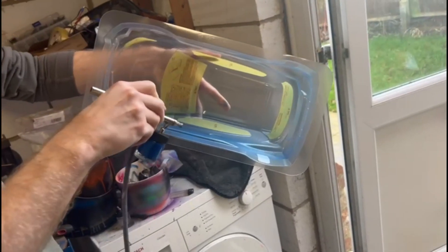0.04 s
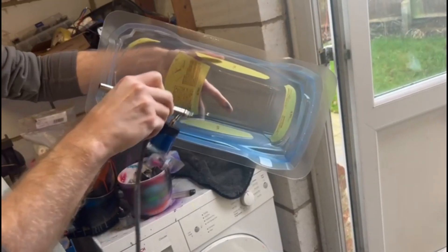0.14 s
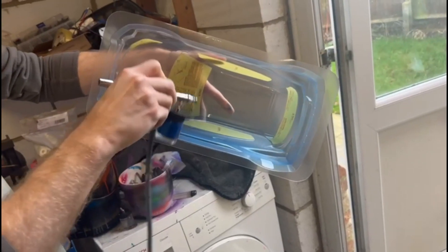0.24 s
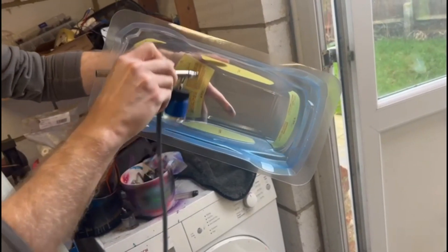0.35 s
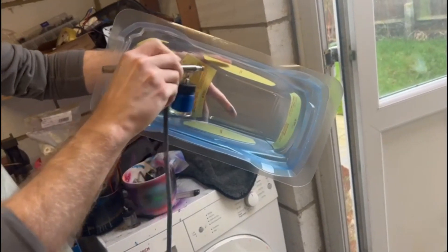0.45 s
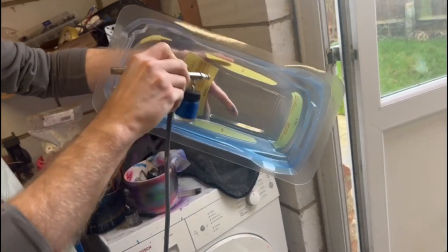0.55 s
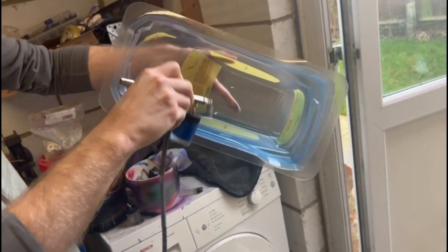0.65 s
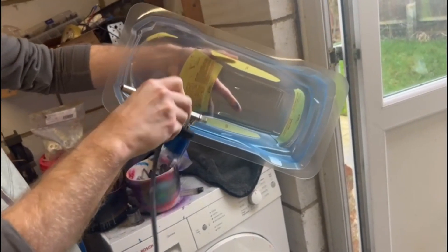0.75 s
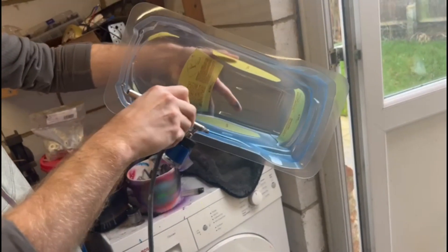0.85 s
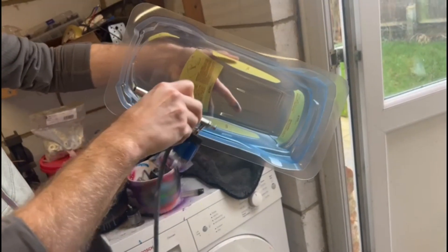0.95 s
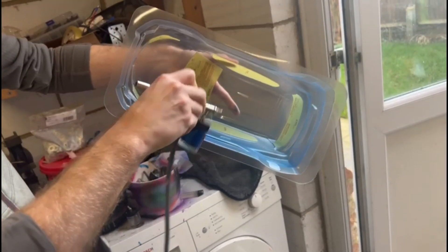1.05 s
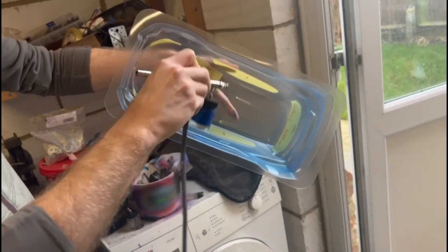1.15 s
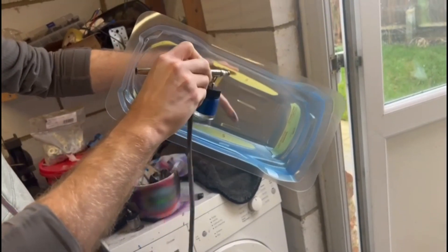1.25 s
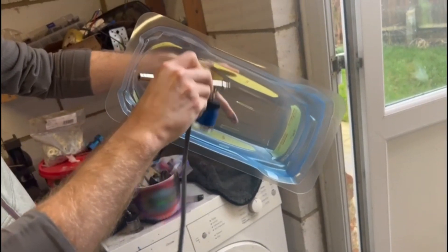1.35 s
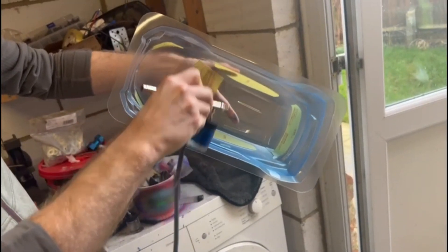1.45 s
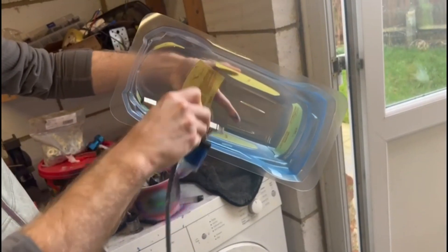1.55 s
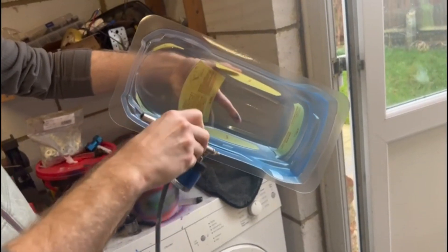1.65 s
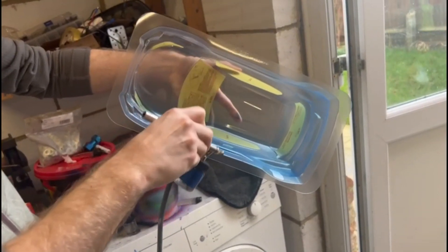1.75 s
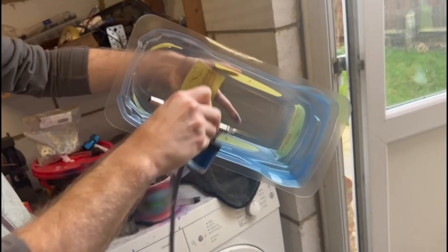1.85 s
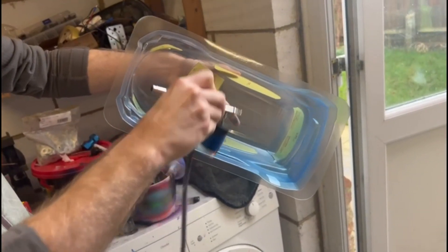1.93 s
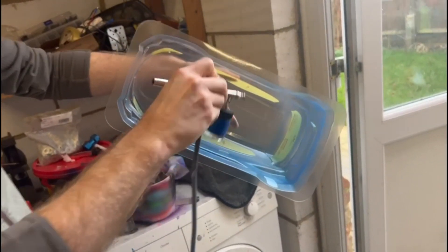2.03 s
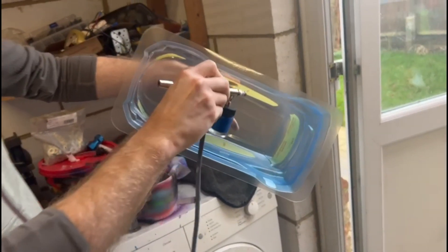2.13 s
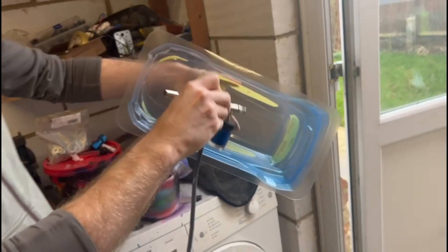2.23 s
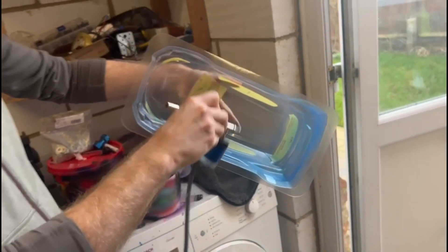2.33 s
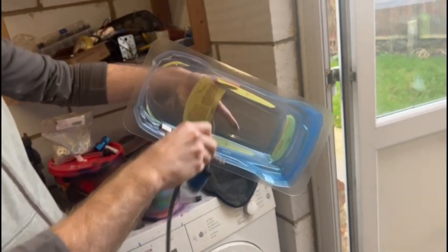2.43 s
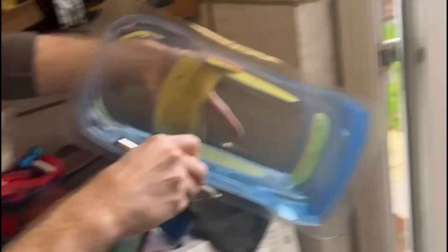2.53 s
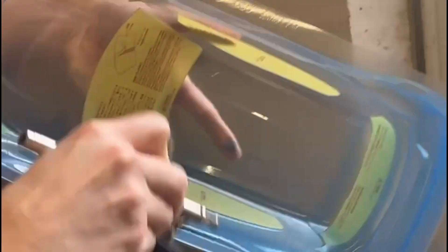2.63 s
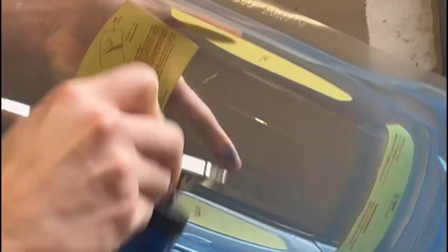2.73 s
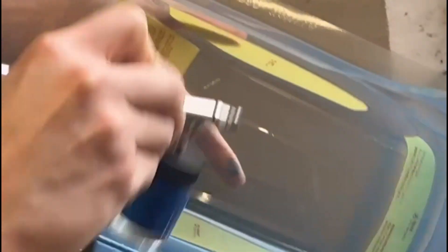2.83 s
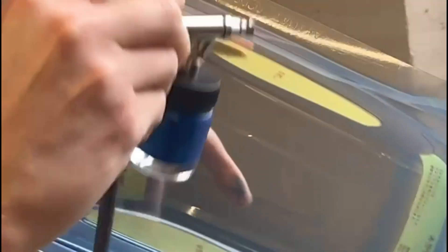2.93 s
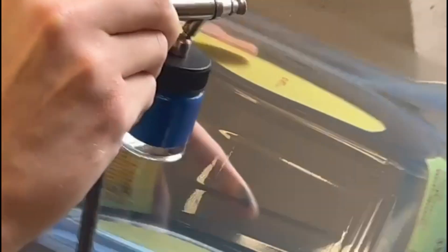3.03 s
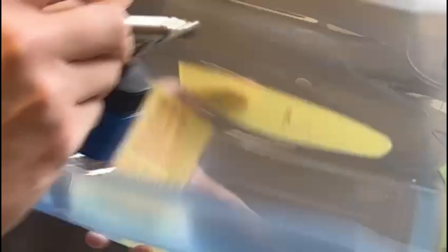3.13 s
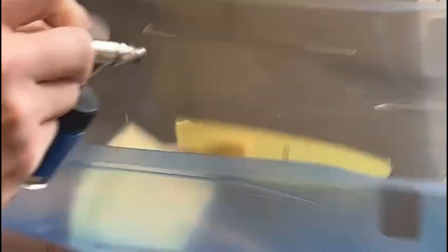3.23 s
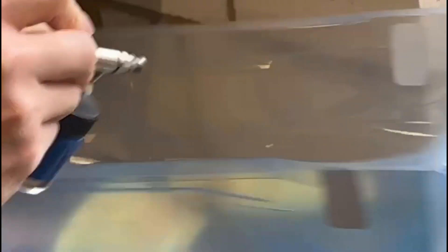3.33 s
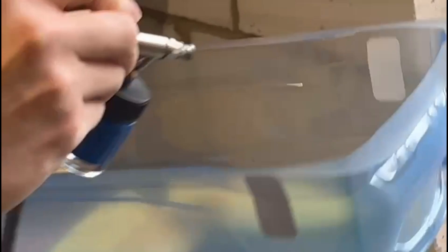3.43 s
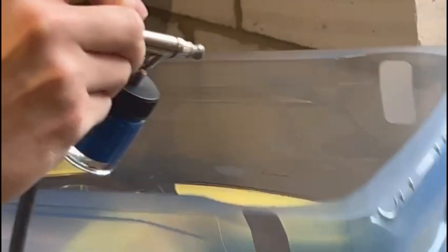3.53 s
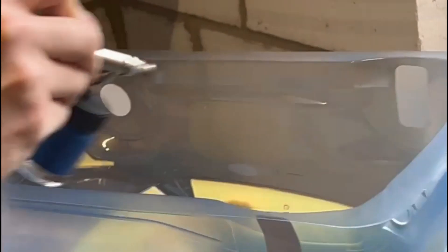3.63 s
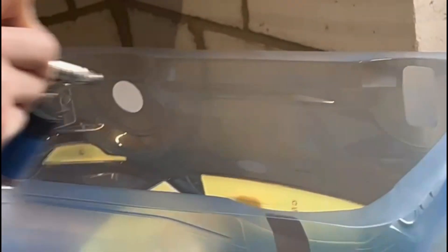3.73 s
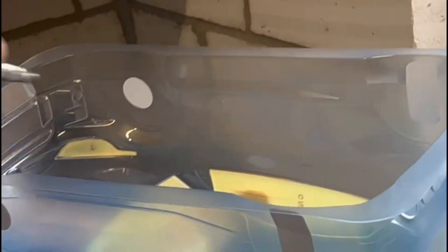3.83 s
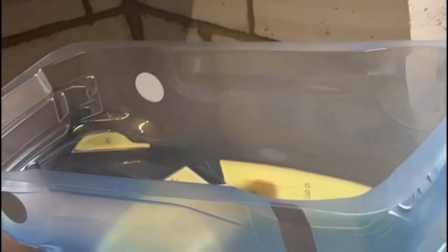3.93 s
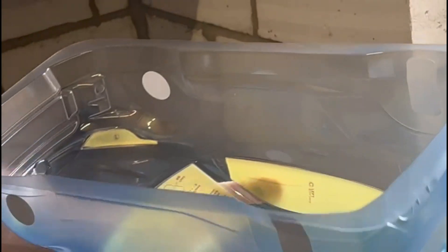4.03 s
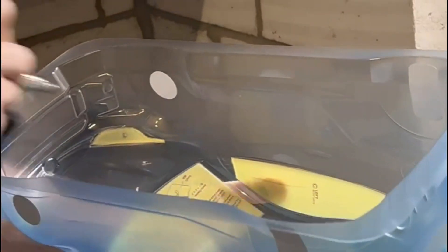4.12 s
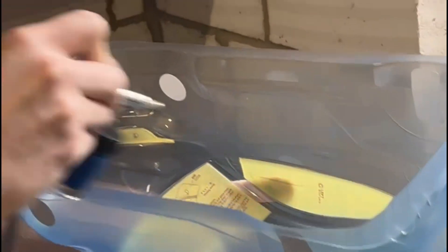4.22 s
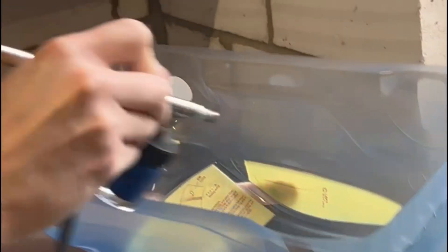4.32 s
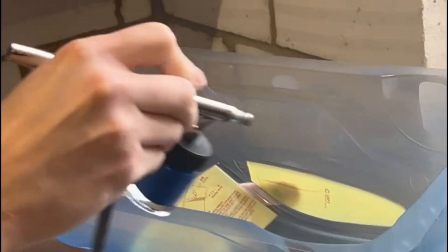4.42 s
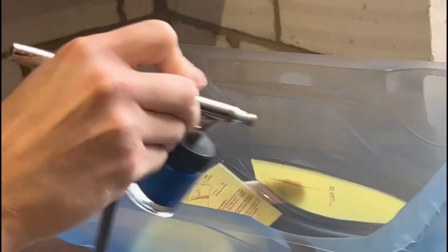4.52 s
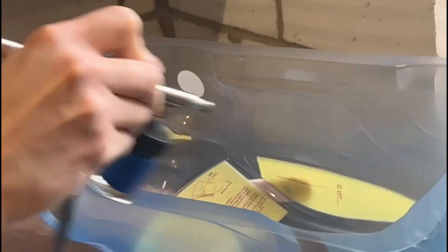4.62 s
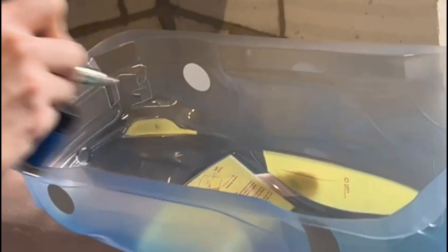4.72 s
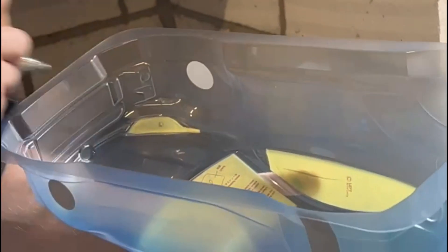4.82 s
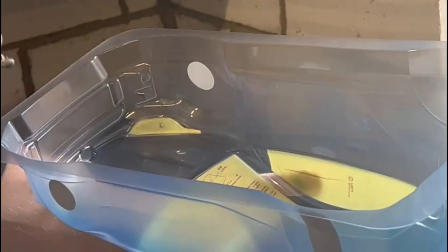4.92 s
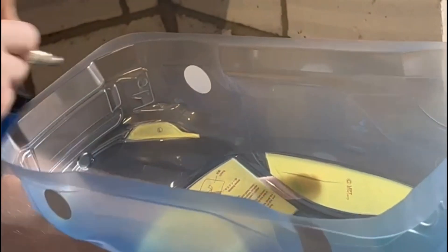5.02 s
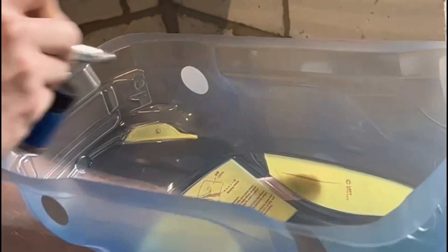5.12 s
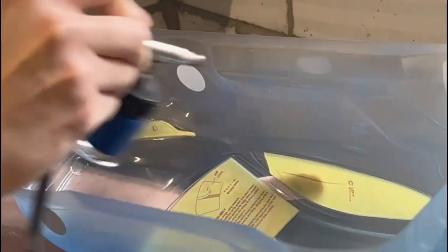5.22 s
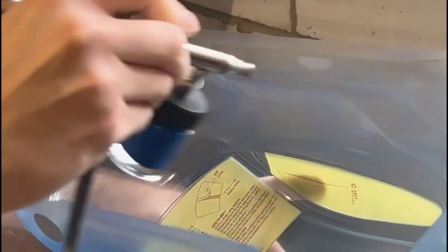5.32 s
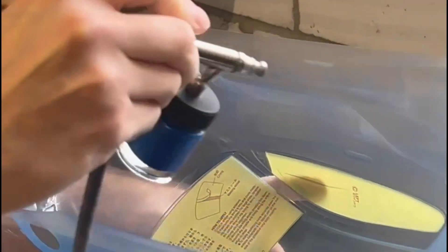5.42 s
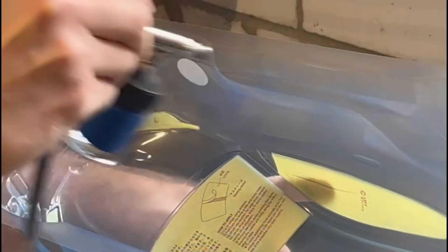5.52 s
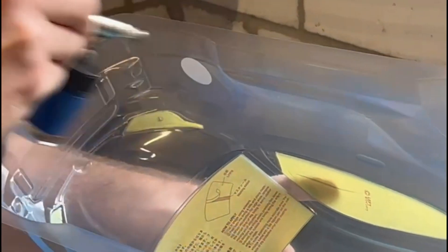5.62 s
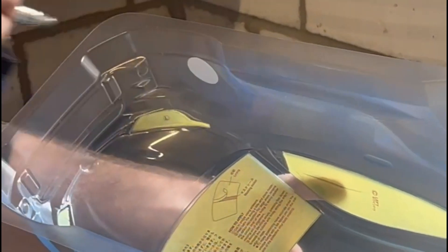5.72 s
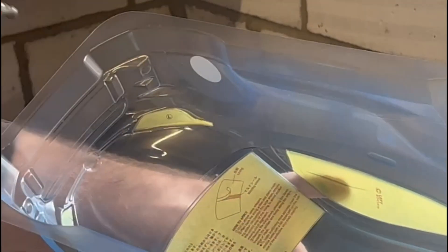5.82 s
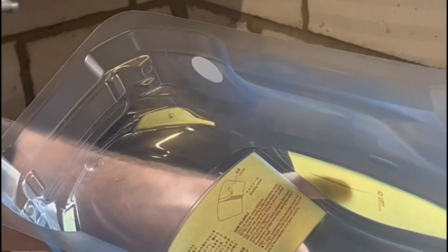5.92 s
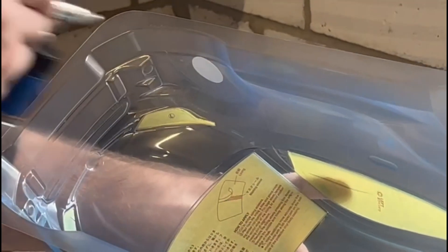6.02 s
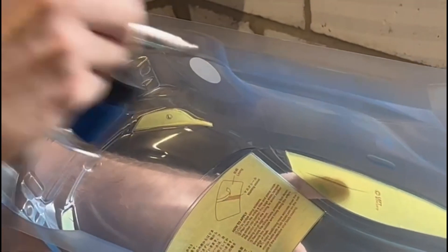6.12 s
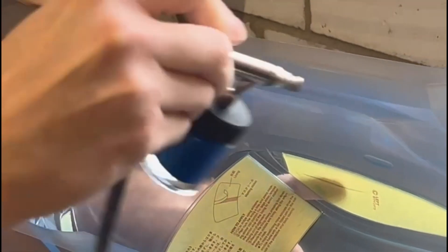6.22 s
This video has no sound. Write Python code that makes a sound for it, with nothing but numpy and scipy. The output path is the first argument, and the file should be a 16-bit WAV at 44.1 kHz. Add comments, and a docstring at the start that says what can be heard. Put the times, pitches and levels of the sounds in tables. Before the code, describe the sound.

An airbrush sprays into a thin plastic model car shell in thirteen short, bright hisses, about two a second, each starting and stopping sharply. The jet rings hollowly in the shell and sometimes whistles lightly. The plastic pops once as it flexes, and after a brief pause the bursts resume slightly softer. A washing machine hums faintly behind, in a small utility room with a close microphone.

```python
"""An airbrush paints a clear plastic model-car shell in thirteen short strokes, in a small utility room.
The turbulent jet hisses, rings the hollow of the shell, whistles on its rim and bounces off its curves.
The thin plastic rumbles in the hand and pops once as it flexes. Behind, over dull room noise, a washing
machine slowly gathers speed. At about 2.5 s the nearby phone zooms in and the stereo image narrows."""
import sys
import numpy as np
from scipy import signal
from scipy.fft import rfft, irfft, next_fast_len
from scipy.io import wavfile
from scipy.ndimage import uniform_filter1d, map_coordinates

SR = 44100
rng = np.random.default_rng(int(sys.argv[2]) if len(sys.argv) > 2 else 0)


def waveform_to_disk(signal):
    """Save audio, clipped to [-1, 1], as 16-bit WAV at the path in sys.argv[1]."""
    frames = np.transpose(np.atleast_2d(signal))
    scaled = np.clip(frames, -1, 1) * 32767
    samples = np.round(scaled).astype(np.int16)
    wavfile.write(sys.argv[1], SR, samples)


N = 276059


def undb(db):
    """Decibels to gain."""
    return 10 ** (np.asarray(db) / 20)


def automation(points):
    """A lane of (t/s, value) breakpoints joined by straight lines."""
    times, values = np.transpose(points)
    return np.interp(np.arange(N) / SR, times, values)


def bins():
    """Frequencies of a padded spectrum, in Hz."""
    return np.fft.rfftfreq(2 * next_fast_len(N // 2 + SR // 2), 1 / SR) + 1e-6


def through(x, response):
    """Filter by a frequency response."""
    return irfft(rfft(x, 2 * len(bins()) - 2) * response)[..., :N]


def colour(points):
    """EQ curve through (f/Hz, level/dB) points."""
    hz, db = np.transpose(points)
    return undb(np.interp(np.log(bins()), np.log(hz), db))


def resonance(hz, width, at=None):
    """One resonant peak, gain 1 at its centre; over the whole spectrum or at given frequencies."""
    f = bins() if at is None else at
    return 1 / (1 + 1j * (f * f - hz * hz) / (f * width))


def modes(rows):
    """A bank of steep-skirted resonances from (f/Hz, nominal width/Hz, level/dB) rows."""
    power = sum(np.abs(undb(db) * resonance(hz, 1.44 * width) ** 2) ** 2 for hz, width, db in rows)
    return np.sqrt(power)


def noise(response):
    """Two unrelated filtered noises (mid, side) of rms 1."""
    x = through(rng.standard_normal((2, N)), response)
    return x / x.std()


def walk(rate_hz):
    """Smooth random modulator: sample and hold, slewed twice; spread near 1."""
    hold = max(int(SR / rate_hz), 1)
    held = rng.standard_normal(N)[np.arange(N) // hold]
    return 1.62 * uniform_filter1d(uniform_filter1d(held, hold), hold)


def ring_down(start_s, hz, db, t60, rise_s):
    """One struck mode with a soft attack and an exponential decay."""
    age = np.maximum(np.arange(N) / SR - start_s, 0)
    envelope = (1 - np.exp(-age / rise_s)) * np.exp(-np.log(1000) * age / t60)
    return undb(db) * np.sin(2 * np.pi * hz * age) * envelope


def room_tone():
    """A dull, gently swelling noise bed, more alike at both ears in the bass."""
    # tone of the bed: f/Hz, level/dB
    bed_eq = [(25, -11.5), (60, 4.5), (120, -2.5), (250, -0.5), (400, -10.5), (900, -11), (1500, -14.5),
              (3000, -26), (6000, -35), (9000, -48), (15000, -57.5)]
    # its fader ride: t/s, level/dB
    bed_ride = [(0, -47), (2.6, -51.5), (3.1, -54), (4.8, -51.5), (6.26, -48.5)]
    mid, side = noise(colour(bed_eq))
    side = through(side, np.minimum(bins() / 1100, 1) ** 0.2)
    swell_db = 1.6 * walk(3.9)
    return undb(automation(bed_ride) + swell_db) * np.array([mid, side])


def washing_machine(start_hz=57, full_hz=113.4, spin_up_s=6.46, waver_db=2):
    """The motor spins up, its first three orders sweep through the panels, and the cabinet booms."""
    # cabinet panels that sing as an order passes: f/Hz, width/Hz, level/dB
    panels = [(71, 8, -51.5), (84, 7.7, -58), (150.5, 11.2, -58), (184.7, 5.9, -52), (236, 16, -67)]
    # fader ride of the cabinet's deep boom: t/s, level/dB
    boom_ride = [(0.2, -47.5), (1, -52.5), (2.2, -49), (3.2, -59), (6.26, -52.5)]
    motor_hz = full_hz + (start_hz - full_hz) * np.exp(-np.arange(N) / SR / spin_up_s)
    phase = 2 * np.pi * np.cumsum(motor_hz * (1 + 0.0029 * walk(6.73))) / SR
    hum = 0
    for order in (1, 2, 3):
        power = sum(np.abs(undb(db) * resonance(hz, width, at=order * motor_hz)) ** 2
                    for hz, width, db in panels)
        hum = hum + np.sqrt(2 * power) * np.sin(order * phase)
    deep_boom = undb(automation(boom_ride)) * noise(resonance(hz=68, width=9.4) ** 2)
    upper_boom = undb(-65.5) * noise(resonance(hz=119, width=36) ** 2)
    return (hum * undb(waver_db * walk(7.5)) + deep_boom + upper_boom) * np.array([[1], [.6]])


def grip_rumble(start_s=2.27, end_s=2.92, level_db=-53.5, fade_s=0.088):
    """The shell rumbles softly as the hand shifts its grip."""
    t = np.arange(N) / SR
    envelope = np.clip(np.minimum(t - start_s, end_s - t) / fade_s + .5, 0, 1)
    return undb(level_db) * envelope * noise(resonance(hz=128, width=50) ** 2)


def shell_pop(start_s=2.4675, wobble_lag_s=.01):
    """The thin plastic snaps through: a quick knock, then the whole panel wobbles."""
    # modes of the buckling shell: f/Hz, level/dB, t60/s
    knock_modes = [(522, -28.5, .04), (580, -22.5, 0.043), (1140, -21.5, 0.011), (1586, -31, 0.018)]
    knock = sum(ring_down(start_s, hz, db, t60, rise_s=0.0014) for hz, db, t60 in knock_modes)
    wobble = ring_down(start_s + wobble_lag_s, hz=63, db=-24.5, t60=.08, rise_s=0.0013)
    return np.array([knock + wobble, 0.89 * knock])


def rim_blast(start_s=0.909, level_db=-33, attack_s=0.0062, decay_s=0.058):
    """A short, soft puff as the jet crosses the edge of the shell."""
    # tone of the puff: f/Hz, level/dB
    puff_eq = [(120, -19), (400, -1.0), (750, -3), (1200, -7.0), (2500, -12), (8000, -43)]
    puff = noise(colour(puff_eq)) * np.array([[1], [.35]])
    age = np.maximum(np.arange(N) / SR - start_s, 0)
    envelope = np.minimum(age / attack_s, 1) * np.exp(-age / decay_s)
    return undb(level_db) * puff * envelope


def shell_reflections(x, depth_db, patch_hz, patch_s):
    """Reflections off the curved shell add and cancel, so peaks and dips wander as the hands move."""
    hz, times, spectrum = signal.stft(x, SR, nperseg=512)
    grid = np.meshgrid(hz / patch_hz, times / patch_s, indexing="ij")
    ripple = np.array([map_coordinates(rng.standard_normal((128, 128)), grid, mode="mirror") for _ in x])
    gain = undb(np.interp(times, np.arange(N) / SR, depth_db) * np.minimum(ripple, 1.2))
    power = np.mean(np.abs(spectrum) ** 2, axis=2, keepdims=True) + 1e-18
    power_gain = np.sum(power * gain ** 2, axis=1, keepdims=True) / np.sum(power, axis=1, keepdims=True)
    gain /= np.sqrt(power_gain)  # the colour moves, the level holds
    return signal.istft(spectrum * gain, SR)[1][:, :N]


def stroke_envelopes(open_s=.006, close_s=0.01, surge=0.068, surge_s=0.0077, swell_s=0.041):
    """One envelope a spray layer: the valve snaps open, the hand sweeps in and away, the valve shuts."""
    # trigger pulls: open t/s, shut t/s, hiss level/dB at the closest point, its place/share of stroke,
    # loss/dB half a stroke away, then level/dB re hiss of rush, cavity, ring and whistle
    trigger_pulls = [ (-0.28, 0.0, -31, 0.26, 1.5, -27, -19, -19.5, -24),
                     (0.092, 0.415, -22.5, 0.52, 7, -36, -16.5, -13, -29),
                     (0.525, 0.773, -21.5, 0.59, 5, -35, -20, -14.5, -37),
                     (0.904, 1.258, -23, 0.59, 7.5, -28.5, -16, -11, -46),
                     (1.377, 1.646, -24.5, 0.56, 5, -27.5, -20, -15.5, -33),
                     (1.773, 2.073, -21.5, 0.53, 6.5, -30.5, -18, -11.5, -12.5),
                     (2.21, 2.432, -22, 0.53, 6, -24.5, -21, -9, -11),
                     (2.6, 2.901, -24, 0.62, 6, -24, -26, -18, -11),
                     (3.49, 3.931, -26.5, 0.65, 6, -31, -19, -33, -23),
                     (4.077, 4.414, -25.5, 0.5, 5, -31.5, -16.5, -26.5, -25),
                     (4.541, 4.878, -25, 0.54, 7, -35, -16.5, -24, -21),
                     (5.001, 5.342, -26, 0.44, 3, -37, -19, -24, -19.5),
                     (5.468, 5.823, -24.5, 0.8, 2.5, -30.5, -18.5, -21, -20),
                     (5.994, 6.243, -26.5, 0.43, 3, -21.5, -17.5, -19.5, -17)]
    # the jet dips into the shell and the rush swells: t/s, level/dB
    rush_swells = [(2.64, -47), (5.21, -47.5), (5.71, -46), (6.09, -56)]
    t = np.arange(N) / SR
    hiss, rush, cavity, ring, whistle = np.zeros((5, N))
    for start, end, db, closest, loss_db, rush_db, cavity_db, ring_db, whistle_db in trigger_pulls:
        age = np.maximum(t - start, 0)
        away = 2 * (np.minimum(age / (end - start), 1) - closest)  # in half strokes
        aim = undb(-loss_db * away ** 2)
        valve = np.minimum(age / open_s, 1) * np.exp(-np.maximum(t - end, 0) / close_s)
        pressure = 1 + surge * np.exp(-age / surge_s)  # the hose charges up between strokes
        flow = undb(db) * aim * valve * pressure
        aimed_flow = flow * aim ** .95  # ring and whistle need a truer aim, so they fade faster
        hiss += flow
        rush += undb(rush_db) * flow
        cavity += undb(cavity_db) * flow
        ring += undb(ring_db) * aimed_flow
        whistle += undb(whistle_db) * aimed_flow
    rush += sum(undb(db) * np.exp(-((t - peak_s) / swell_s) ** 2) for peak_s, db in rush_swells)
    return hiss, rush, cavity, ring, whistle


def airbrush(width, jet_db=-0.69, ring_db=0.5, rush_db=2.0, buffet_db=0.9):
    """The turbulent jet hisses, rings the shell, whistles on the rim and rushes low over the plastic."""
    # bright hiss of the free jet: f/Hz, level/dB
    jet_eq = [(200, -32.5), (700, -20.5), (1200, -17), (1700, -17), (2500, -11), (3700, -9), (6300, -1),
              (8500, 4), (9300, 1.5), (10400, 0.5), (11500, -4.5), (12300, -28), (14300, -15.5),
              (15600, -33)]
    # air rushing over the shell: f/Hz, level/dB
    rush_eq = [(60, -17.5), (130, 2.5), (200, 1.5), (270, 5), (350, -1.5), (500, -4), (900, -17.5),
               (2500, -34)]
    # air modes of the open shell, always stirred by the jet: f/Hz, width/Hz, level/dB
    cavity_modes = [(484, 107, 1), (775, 195, -1.5), (1625, 300, 0.5), (2280, 110, 2), (2930, 880, -1)]
    # hollow ring when the jet is aimed into a recess: f/Hz, width/Hz, level/dB
    recess_modes = [(1354, 200, -5), (1750, 160, -1), (2126, 274, 5.5), (2910, 480, -0.5), (3490, 130, -2)]
    hiss, rush, cavity, ring, whistle = stroke_envelopes()
    jet = hiss * undb(jet_db) * noise(colour(jet_eq)) + cavity * noise(modes(cavity_modes))
    # the wide image takes in more reflections than the zoomed one
    jet = shell_reflections(jet, depth_db=2.3 + 3.8 * width, patch_hz=240, patch_s=.085)
    hollow = ring * undb(ring_db) * noise(modes(recess_modes))
    rim = whistle * noise(resonance(hz=4650, width=800) ** 2)
    tones = shell_reflections(hollow + rim, depth_db=1 + 2.0 * width, patch_hz=194, patch_s=0.096)
    low_air = rush * undb(rush_db + buffet_db * walk(14)) * noise(colour(rush_eq)) * np.array([[1], [.7]])
    flutter_db = 0.74 * walk(28) + 0.64 * walk(260)  # paint leaves the needle unevenly
    return (jet + tones + low_air) * undb(flutter_db) / np.sqrt(1 + 0.82 * width)


def room_reverb(x, wet_db=-10, t60=0.25, predelay_s=0.00396):
    """Short diffuse tail from brick walls and a glass door."""
    t = np.arange(SR // 2) / SR
    tail = rng.standard_normal((2, len(t))) * np.exp(-np.log(1000) * t / t60) * (t > predelay_s)
    tail /= np.sqrt(np.sum(tail ** 2, axis=1, keepdims=True))
    return x + undb(wet_db) * signal.fftconvolve(x, tail, axes=1)[:, :N]


def scene(spray_pan_db=-1):
    """Mid/side mix, decoded to left and right; the zoom narrows the image and centres the spray."""
    # zoom of the phone: t/s, width (1 wide, 0 zoomed in)
    zoom = [(2.49, 0.72), (2.62, 0)]
    # EQ of the side channel: f/Hz, wide level/dB, zoomed level/dB
    side_eq = [(101, -13, -15), (500, -6.5, -17.5), (1400, -3.5, -6.5), (2300, -7, -34.5), (3000, 1, -33.5),
               (3800, 0.5, -45), (5000, -1.5, -48), (5900, -10.5, -57), (7150, -0.5, -46.5),
               (8000, -10, -46), (9430, 5.5, -30.5), (9900, -24, -41), (12040, -40, -47)]
    width = automation(zoom)
    spray = room_reverb(airbrush(width) + rim_blast())
    mid, side = spray + shell_pop() + grip_rumble() + washing_machine() + room_tone()
    wide, narrow = (through(side, colour(np.array(side_eq)[:, [0, column]])) for column in (1, 2))
    lean = (undb(spray_pan_db) - 1) / (undb(spray_pan_db) + 1)  # a little to the right while wide
    side = width * (wide + lean * spray[0]) + (1 - width) * narrow
    return np.array([mid + side, mid - side])


def record(dry, top_hz=15800):
    """The top treble turns in and out of phase between the ears, and the very top is cut."""
    # treble spread: f/Hz, phase between the ears/half turns
    treble_spread = [(8750, 0), (9200, .5), (9700, .9), (10600, 1.1), (11100, 1.5), (11700, 2), (12850, 2),
                     (13400, 2.8), (14500, 3.1), (15300, 4)]
    hz, half_turns = np.transpose(treble_spread)
    twist = np.pi * np.interp(bins(), hz, half_turns)
    wide = through(dry, np.exp(.5j * twist * np.array([[-1], [1]])))
    high_cut = signal.ellip(10, .2, 70, top_hz, fs=SR, output="sos")
    return signal.sosfilt(high_cut, wide)


dry = scene()
out = record(dry)
waveform_to_disk(out)
```